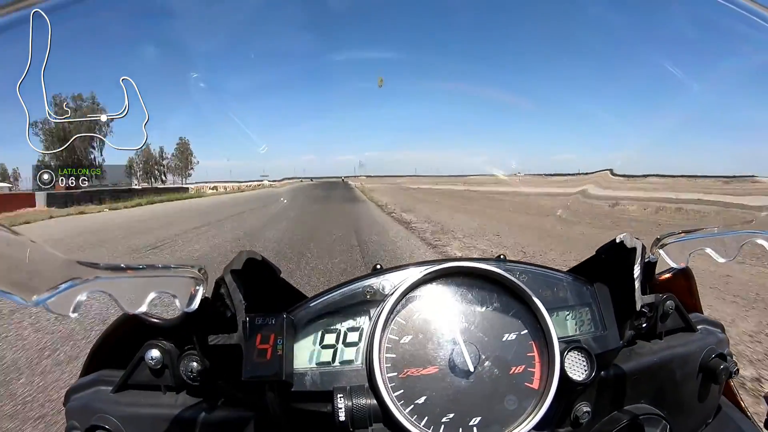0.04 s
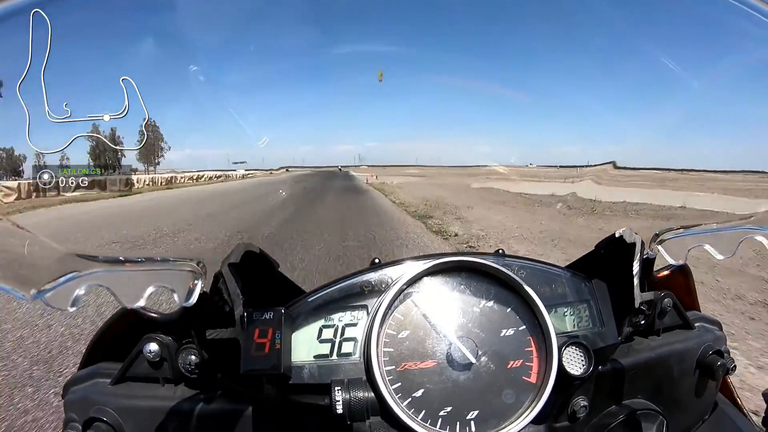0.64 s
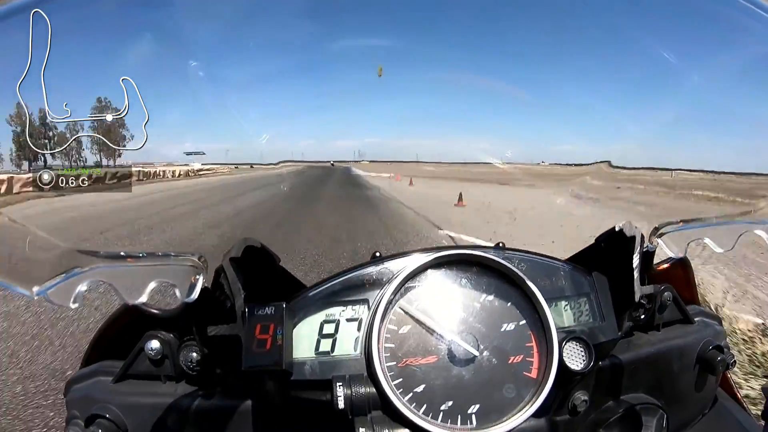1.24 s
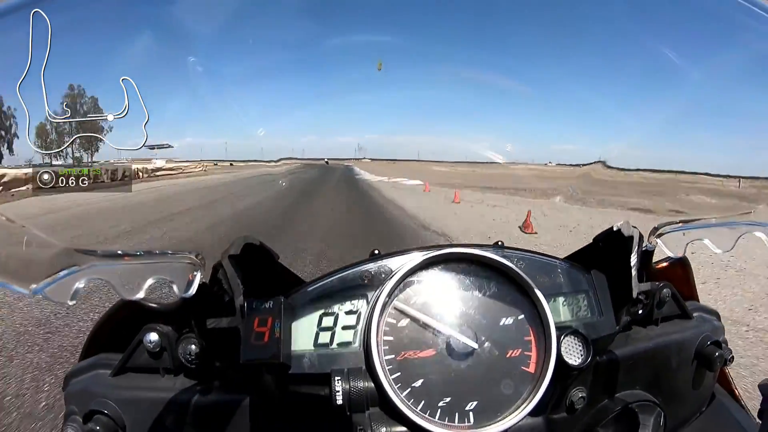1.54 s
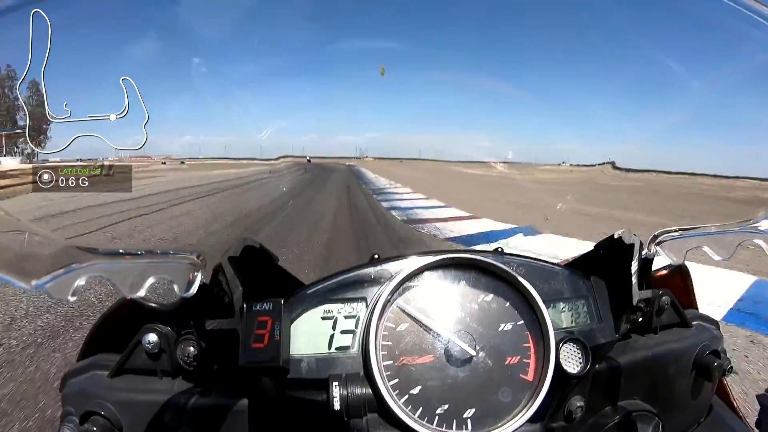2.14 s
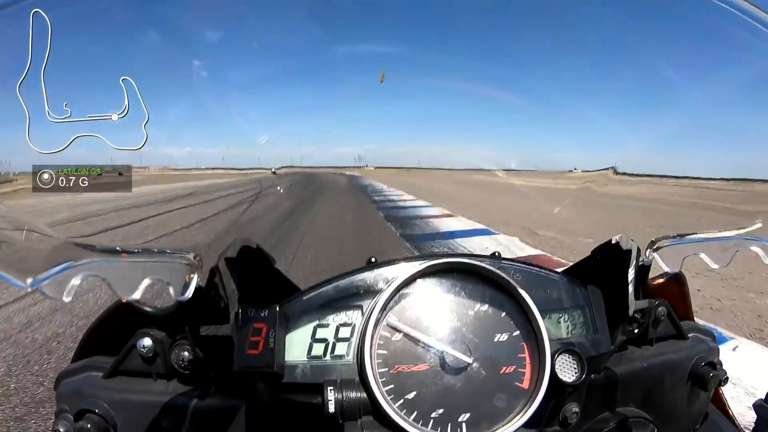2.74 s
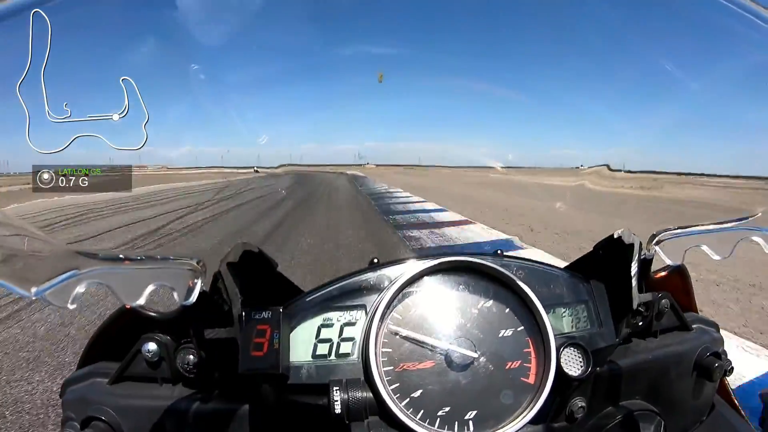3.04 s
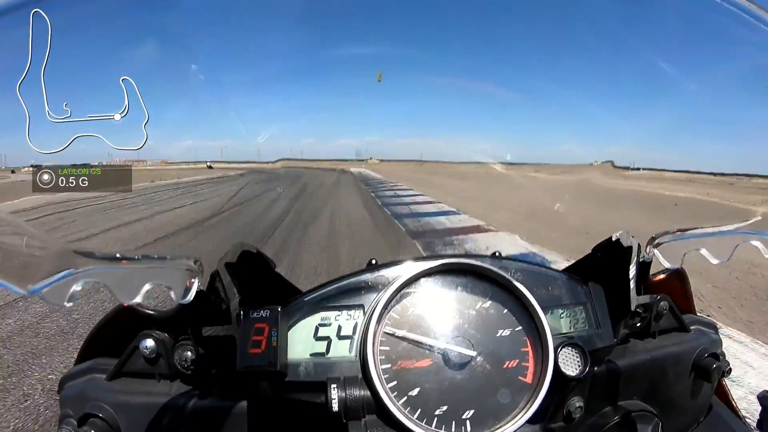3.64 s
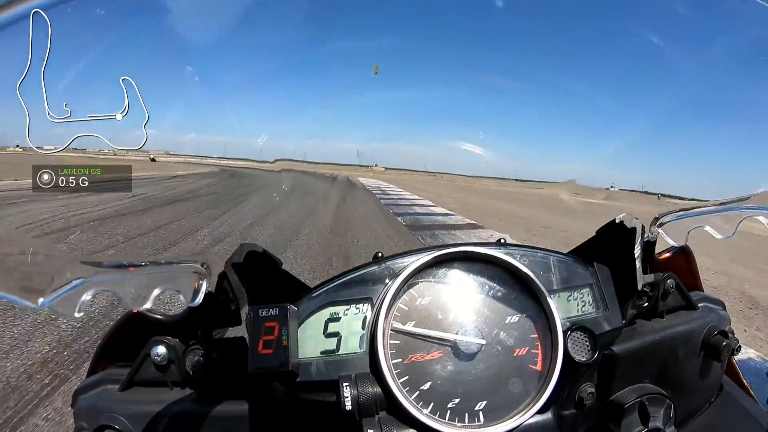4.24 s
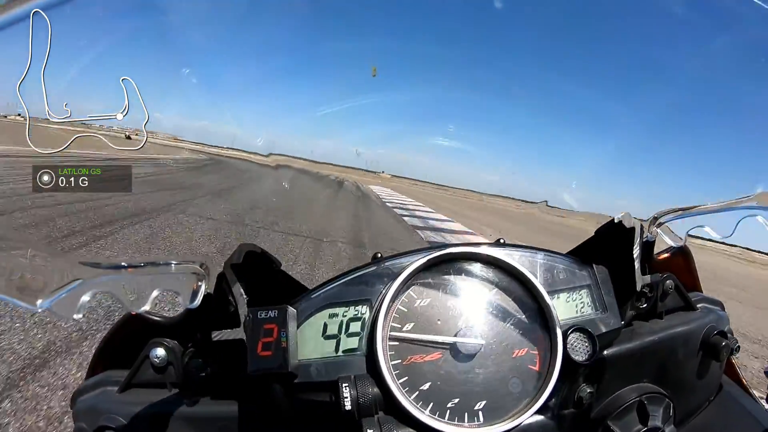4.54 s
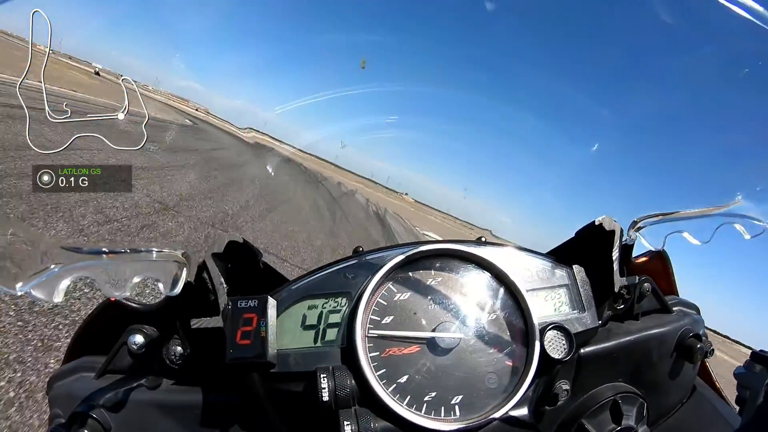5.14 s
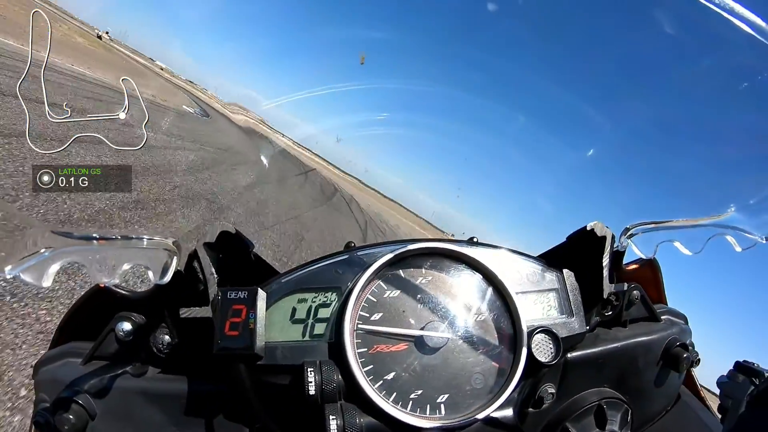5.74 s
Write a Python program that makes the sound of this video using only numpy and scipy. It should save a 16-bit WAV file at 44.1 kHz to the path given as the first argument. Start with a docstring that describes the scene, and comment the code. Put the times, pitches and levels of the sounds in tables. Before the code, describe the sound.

Onboard a sport motorcycle braking for a corner, the engine note falls and blips twice while the fairing rattles and wind rumbles.

```python
"""A booming engine note and a buzzing fairing, close up: a four-cylinder sport motorcycle brakes for a
corner with two downshifts, the microphone tucked behind its screen. Thin overtones and gear whine ride
on the firing note. Engine braking shakes the plastic hardest; the rattle drops whenever the clutch is
pulled and returns as the throttle opens, while a loose fastener ticks in the lean.
Wind rumbles and rushes, and its gusts choke the microphone for instants."""
import sys
import numpy as np
from scipy import signal
from scipy.fft import rfft, irfft
from scipy.io import wavfile
from scipy.ndimage import uniform_filter1d, minimum_filter1d

SR = 44100
rng = np.random.default_rng(int(sys.argv[2]) if len(sys.argv) > 2 else 0)


def materialize(psi):
    """Save the field psi as 16-bit PCM at rate SR to the path in sys.argv[1].

    A 1-D psi becomes a single channel; in a 2-D psi each row is a channel.
    """
    bounded = np.clip(np.atleast_2d(psi).T, -1, 1)
    quanta = np.round(bounded * 32767).astype(np.int16)
    wavfile.write(sys.argv[1], SR, quanta)


N = 255780
TIME = np.arange(N) / SR


def amp(db):
    """Decibels to gain."""
    return 10 ** (np.asarray(db) / 20)


def unit(x):
    """Scales to rms 1."""
    return x / np.sqrt(np.mean(x ** 2) + 1e-20)


def follow(table):
    """The columns of a curve table at every sample."""
    s, *columns = np.transpose(table)
    return np.squeeze([np.interp(TIME, s, c) for c in columns])


def wander(hz, size=16384):
    """Smooth random drift of rms 1, rolling off above hz."""
    f = np.fft.rfftfreq(size, N / SR / size)
    slow = irfft(rfft(rng.standard_normal(size)) * np.exp(-(f / hz) ** 2), size)
    return unit(np.interp(np.linspace(0, size - 1, N), np.arange(size), slow))


def envelope(start, hold_s, rise_s, fall_s):
    """Straight rise, dying away from hold_s after the start."""
    return np.clip((TIME - start) / rise_s, 0, 1) * np.exp(-np.maximum(TIME - start - hold_s, 0) / fall_s)


def arch(start, end):
    """Half a sine from start to end."""
    return abs(np.sin(np.pi * np.clip((TIME - start) / (end - start), 0, 1)))


def colour(x, spectrum, size=2048):
    """Causal filter with the given spectrum: its peaks ring after each click."""
    hz, db = np.transpose(spectrum)
    f = abs(np.fft.fftfreq(size, 1 / SR))
    log_gain = np.log(amp(np.interp(np.log(f + 1), np.log(hz), db)))
    ring = np.fft.ifft(np.exp(np.conj(signal.hilbert(log_gain)))).real
    return signal.oaconvolve(x, ring)[:N]


def resonate(x, hz, width):
    """One resonance of gain 1."""
    return signal.lfilter(*signal.iirpeak(hz, hz / width, fs=SR), x)


def order(cycles, multiple):
    """A sine at a multiple of the firing rate, each multiple with its own starting phase."""
    return np.sin(2 * np.pi * multiple * cycles + multiple ** 2)


def stack(cycles, orders, rough):
    """Engine orders, each fluttering on its own."""
    return sum(amp(db) * (1 + rough * wander(55)) * order(cycles, k) for k, db in orders)


def clicks(cycles):
    """One unit click as each cycle completes."""
    return np.diff(np.floor(cycles), prepend=np.floor(cycles[0])).clip(0, 1)


def strike(events, spectrum, decay_s, scrape, gain_db):
    """Each blow is a click and a short scrape that ring with the given spectrum."""
    blows, grit = np.zeros(N), rng.standard_normal(N)
    for s, db in events:
        at = round(s * SR)
        blows[at] += amp(db)
        blows[at:] += scrape * amp(db) * grit[at:] * np.exp(-np.minimum(TIME[:N - at] / decay_s, 20))
    return amp(gain_db) * colour(blows, spectrum)


def firing_note(cycles, firing_hz, dip_db, gust, choking, lag_s=.037, flutter=.029, sway=.49):
    """A near sine booms through a broad resonance; gusts at the microphone choke it and jostle its phase."""
    # The resonance. Each row: firing rate in Hz, level in dB.
    boom = [(215, -16.5), (229, -10.5), (242, -13), (255, -8.5), (264, -7), (285, -7.5), (308, -7.5),
            (335, -10), (355, -12.5)]
    # The firing note dips briefly, mostly as gusts choke the microphone.
    # Each row: centre in seconds, half length in seconds, dip in dB.
    dips = [(0.278, 0.0039, 7), (0.324, 0.0049, 12), (.405, 0.0058, 9), (0.893, 0.01, 4), (3.153, 0.065, 6),
            (5.05, 0.012, 8), (5.43, .012, 2.5)]
    lagged_hz = np.interp(TIME - lag_s, TIME, firing_hz)
    boom_db = np.interp(lagged_hz, *np.transpose(boom))
    brief_dip_db = sum(db * np.exp(-((TIME - s) / half_s) ** 2) for s, half_s, db in dips)
    level = amp(boom_db - dip_db - brief_dip_db)
    choke = 1 / np.sqrt(1 + (2 * choking * gust) ** 2)
    choke /= np.sqrt(uniform_filter1d(choke ** 2, size=4000))  # keeps the average power
    phase = 2 * np.pi * cycles + sway * choking * wander(47)
    return np.sqrt(2) * level * choke * (1 + flutter * wander(67)) * np.sin(phase)


def vibration(firing_hz, throttle, blip, mid_hz=296):
    """Levels in dB of overtones, buzz and chatter: braking, coasting, throttle and blips add in power."""
    # Engine braking, clutch home. Each row: start, hold and release in seconds, then relative
    # levels of overtones, buzz and chatter in dB.
    overruns = [(-.8, 2.3, .025, -34.6, -35.3, -53.5), (1.66, 1.17, .06, -33, -35.8, -51),
                (3.35, .435, .025, -41.5, -38.5, -55)]
    # Each of these lists overtones, buzz, chatter.
    build_s = (.55, 0.4, 0.94)
    coasting_db = (-46, -49.5, -80.5)
    with_throttle_db = (-6.5, -4.5, -31.5)
    with_blip_db = (-6.5, -10, -42.5)
    rev_db_per_hz = (0, .1033, .02)
    braking = sum(np.transpose([envelope(start, hold_s, rise_s, fall_s) for rise_s in build_s]) * amp(db)
                  for start, hold_s, fall_s, *db in overruns)
    braking *= amp(np.outer(firing_hz - mid_hz, rev_db_per_hz))
    driving = np.outer(throttle, amp(with_throttle_db))
    blipping = np.outer(blip, amp(with_blip_db))
    return 10 * np.log10(braking ** 2 + amp(coasting_db) ** 2 + driving ** 2 + blipping ** 2).T


def overtones(cycles, level_db):
    """Upper engine orders, smeared by uneven firing and lifted by the bodywork around the microphone."""
    # Gear mesh and uneven firing add tones between the whole orders.
    # Each row: multiple of the firing rate, relative level in dB.
    orders = [(2, 3.5), (2.5, -25.5), (2.75, -13.5), (3, -3), (3.75, -4), (4, -1.5), (4.5, -13), (5, -3.5),
              (5.75, -20), (6, -6.5), (7, -24.5), (8, -33), (9, -33.5), (10, -17.5), (12, -14.5),
              (13, -21.5), (14, -21), (15, -19.5)]
    # Bodywork resonances. Each row: centre in Hz, width in Hz, gain of the added ring in dB.
    panels = [(950, 360, 0), (1630, 190, 1.5), (2010, 47, 5)]
    raw = stack(cycles + .0075 * wander(60), orders, rough=.48)
    ring = sum(amp(db) * resonate(raw, hz, width) for hz, width, db in panels)
    return amp(level_db) * unit(raw + ring)


def shaking(drift=.03):
    """The rattle's swing in dB as the front of the bike shakes in spells, each at an unsteady rate."""
    # Each row: start and end in seconds, shake rate in Hz, swing in dB.
    shakes = [(-.4, 1.9, 24.9, 3), (1.148, 1.55, 52, 2.5), (1.652, 2.1, 86, 3), (1.85, 2.65, 24.9, 3),
              (4.6, 7.5, 17, 0.5)]
    swing = np.zeros(N)
    for start, end, hz, db in shakes:
        unsteady_hz = hz * (1 + drift * wander(4))
        swing += db * arch(start, end) * np.sin(2 * np.pi * np.cumsum(unsteady_hz) / SR)
    return swing


def fairing_buzz(cycles, shake_db, level_db, slack=.061, contact=.38, bed=.084, uneven_db=1.7, gain_db=-1):
    """The plastic screen, right by the microphone, taps and rasps once a firing, louder on each shake."""
    # The screen's ring. Each row: frequency in Hz, relative gain in dB.
    spectrum = [(700, -22.5), (1200, -12.5), (1590, -1), (1900, 2.5), (2200, -22.5), (2800, -5),
                (3200, -4.5), (3480, 4), (3800, -2.5), (4200, -2.5), (4900, -13), (5350, -5.5),
                (5680, -0.5), (6100, -22), (7100, -25), (9000, -17), (11500, -61.5)]
    since_contact = (cycles + slack * wander(80)) % 1
    rasp = (bed + np.exp(-since_contact / contact)) * rng.standard_normal(N)
    taps = clicks(cycles + .008 * wander(60))
    drive = (unit(rasp) + .55 * unit(taps)) * amp(shake_db + uneven_db * wander(110))
    return amp(level_db + gain_db) * unit(colour(drive, spectrum))


def edge_chatter(cycles, shake_db, level_db, steep=1.2, uneven_db=3, gain_db=6):
    """A loose edge clicks and scrapes about once a firing, in bursts at the height of each shake."""
    # The edge's bright ring. Each row: frequency in Hz, relative gain in dB.
    spectrum = [(1000, -2), (3500, 2.5), (6000, -0.5), (7200, -15.5), (8200, -6.5), (9100, -1.5),
                (9800, -4.5), (10700, -11), (11400, -23.5), (14000, -24), (16000, -38.5)]
    loose_cycles = cycles + .12 * wander(110)
    rub = .2 * np.exp(-(loose_cycles % 1) / .2) * rng.standard_normal(N)
    drive = (clicks(loose_cycles) + rub) * amp(steep * shake_db + uneven_db * np.tanh(wander(120)))
    return amp(level_db + gain_db) * unit(colour(drive, spectrum))


def wind(gust, choking, rumble_db, rush_db, lump_db=2, flicker_db=1.5, spit=.94):
    """Air on the microphone: a lumpy rumble, and a rush that spits with each gust."""
    # The two wind spectra. Each row: frequency in Hz, relative gain in dB.
    rumble_spectrum = [(15, -18), (30, -7.5), (65, 1.5), (110, -2), (160, 1), (210, -2.5), (280, 4),
                       (380, -12), (520, -17), (900, -45), (6000, -110)]
    rush_spectrum = [(120, -9), (220, -6), (278, 19), (340, 2.5), (450, -6), (600, 0.5), (780, 3),
                     (1000, 5), (1300, 5), (1550, 1.5), (2000, -2.5), (2500, -3.5), (2900, -14.5),
                     (4500, -7.5), (6000, -13), (7200, -27), (12000, -70.5)]
    rumble = unit(colour(rng.standard_normal(N), rumble_spectrum) * amp(lump_db * wander(60)))
    grain = amp(flicker_db * wander(200)) * (1 + spit * choking * np.minimum(gust ** 2, 2))
    rush = unit(colour(rng.standard_normal(N) * grain, rush_spectrum))
    return amp(rumble_db + 3.5) * rumble + amp(rush_db + 1.5) * rush


def gear_whine(cycles, jitter=.008):
    """Gears, and parts that an engine order sets singing, swell and fade in thin crank-locked whines."""
    # Each row: start and end in seconds, multiple of the firing rate, level in dB, roughness from 0 to 1.
    whines = [(0.03, 0.657, 6, -46, 0.5), (0.5, 0.95, 4, -44, 0.7), (0.65, 1.074, 5, -44, 0.7),
              (1.473, 1.55, 4, -34.5, 0.3), (2.38, 2.887, 4, -39, 0.4), (2.86, 3.032, 4, -45, 0.6),
              (3.2, 4.2, 4, -43.5, 0.8), (3.002, 4.499, 8.48, -52.5, .4), (3.2, 4.422, 2.76, -53, 0.4),
              (4.1, 6.195, 2.97, -49.5, 0.51)]
    out = np.zeros(N)
    for start, end, multiple, db, rough in whines:
        swell = np.sqrt(2) * amp(db) * np.sqrt(arch(start, end))
        out += swell * (1 + rough * wander(53)) * order(cycles + jitter * wander(25), multiple)
    return out


def fairing_knocks():
    """Bumps knock the fairing, close to the microphone."""
    # Each row: time in seconds, relative strength in dB.
    knocks = [(0.057, -13), (0.1234, -13), (0.2014, -14), (0.4014, -19), (0.4772, -11), (0.591, -12.5),
              (0.7905, -15.5), (1.9758, -21), (3.1227, -22.5), (3.7754, -30), (4.8415, -15.5), (5.029, -18),
              (5.041, -22), (5.2644, -20)]
    # The struck fairing. Each row: frequency in Hz, gain in dB.
    spectrum = [(500, -18.5), (1500, 9.5), (2700, 1.5), (3500, 3.5), (4500, -1), (5700, 1.5), (7100, -23),
                (9100, -4.5), (10600, -21.5), (11600, -41), (15000, -44.5)]
    return strike(knocks, spectrum, decay_s=.004, scrape=.2, gain_db=6.5)


def throttle_blips(rise_s=.15):
    """A blip at each downshift: gain of the burble, dip of the firing note in dB, added choking."""
    # Each row: start, hold and decay in seconds, burble level in dB, dip in dB, added choking.
    downshifts = [(1.562, .26, 0.079, -29.5, 1.9, 0.02), (3.029, 0.2, .22, -35, 1.1, .1)]
    return sum(np.outer([amp(db), dip_db, choking], envelope(start, hold_s, rise_s, fall_s))
               for start, hold_s, fall_s, db, dip_db, choking in downshifts)


def exhaust_burble(cycles, blip, uneven_db=1.5, puff_cycles=.6):
    """Ragged puffs from the exhaust, one a firing, as the throttle is blipped."""
    # The exhaust's tone. Each row: frequency in Hz, relative gain in dB.
    spectrum = [(150, -13), (470, 6.5), (640, 5), (800, -2), (1080, 2.5), (1450, -7), (1900, -9.5),
                (2700, -28), (6000, -36.5), (12000, -80)]
    puffs = np.exp(-(cycles % 1) / puff_cycles) * amp(uneven_db * wander(130)) * rng.standard_normal(N)
    return blip * unit(colour(puffs, spectrum))


def gearbox_clunks():
    """The gearbox clunks at the second downshift and as the drive takes up."""
    # Each row: time in seconds, relative strength in dB.
    clunks = [(3.077, -37), (3.098, -23), (3.359, -30)]
    # The gearbox's ring. Each row: frequency in Hz, gain in dB.
    spectrum = [(150, 0), (500, 16), (750, 1), (1080, 10.5), (1450, -15), (1900, -2), (2800, -36.5),
                (6000, -28), (12000, -80)]
    return strike(clunks, spectrum, decay_s=.0066, scrape=.08, gain_db=29)


def loose_fastener(shake_hz=23.54, touches_per_s=80, uneven_db=3, jiggle_db=-39.5):
    """A fastener ticks at the shift; leaned over, it jiggles once a shake with lighter touches between."""
    # The loudest ticks. Each row: time in seconds, relative strength in dB.
    ticks = [(3.159, -27), (3.175, -25), (4.7825, -34), (4.9521, -23), (4.998, -23), (5.0689, -26),
             (5.3882, -21), (5.4176, -23), (5.4804, -22), (5.5648, -25), (5.6077, -23), (5.6514, -20.5),
             (5.6944, -19.5), (5.7154, -19)]
    # The fastener's ring. Each row: frequency in Hz, gain in dB.
    spectrum = [(600, -21), (1700, 5), (2800, -6), (3250, -3), (3520, 7), (3900, -2.5), (5000, -15.5),
                (5750, -11.5), (7000, -26), (9200, -21.5), (11500, -50)]
    loud_ticks = strike(ticks, spectrum, decay_s=.003, scrape=.05, gain_db=24.5)
    beats = clicks(shake_hz * TIME + .04 * wander(20)) * amp(uneven_db * np.tanh(wander(40)))
    touches = (rng.random(N) < touches_per_s / SR) * rng.uniform(.5, 1, N)
    lean = np.clip((TIME - 4.21) / .72, 0, 1)  # the bike tips into the corner
    return loud_ticks + amp(jiggle_db) * lean * unit(colour(beats + .73 * touches, spectrum))


def intake_growl(cycles, throttle, jitter=.004):
    """With the throttle ajar the intake adds a rough comb of engine orders."""
    # Each row: multiple of the firing rate, relative level in dB.
    orders = [(1.5, -7.5), (2, 1), (2.5, -1.5), (3, -0.5), (4, -7), (4.5, -14), (5, -12), (5.75, -9),
              (6, -10), (8.5, -6.5), (9, -10), (9.5, -14), (10, -14.5), (10.5, -3.5), (11.5, -7),
              (21, -15.5)]
    return throttle * unit(stack(cycles + jitter * wander(60), orders, rough=.5))


def scene(full_choke_db=-13.5, choke_steepness=1.4, throttle_flutter=5.6):
    """Engine, fairing and wind at one microphone riding behind the screen."""
    # Engine speed. Each row: time in seconds, firing rate in Hz.
    revs = [(0, 353), (.4, 335), (1.13, 293.5), (1.4, 295.6), (1.5, 276.5), (1.61, 239.1), (1.69, 271.8),
            (1.88, 291), (2.08, 294.2), (2.95, 265.1), (3.03, 255.3), (3.15, 219), (3.23, 243),
            (3.41, 248.4), (3.7, 267.6), (4.05, 252), (4.25, 241.7), (4.95, 225.9), (5.22, 228),
            (5.3, 238.7), (5.35, 222.8), (5.8, 229.7)]
    # The throttle cracks open. Each row: time in seconds, level of the intake growl in dB.
    opening = [(0, -80), (3.3, -70), (3.9, -53.5), (4.4, -40.5), (4.9, -37.5), (5.4, -35), (5.8, -33)]
    # Wind strength. Each row: time in seconds, relative levels of rumble and rush in dB.
    airflow = [(0, -18, -30), (.75, -23.5, -31.5), (1.3, -30, -34), (1.58, -24.5, -36.5),
               (1.75, -20.5, -35.5), (1.95, -23, -36), (2.25, -25.5, -34.5), (2.55, -30, -35.5),
               (3.05, -26.5, -38), (3.35, -24, -37), (3.63, -30.5, -31.5), (3.84, -30, -39.5),
               (4.3, -29.5, -35.5), (4.6, -24.5, -34.5), (5.25, -27, -29), (5.8, -24, -28.5)]
    firing_hz, throttle = follow(revs), amp(follow(opening))
    rumble_db, rush_db = follow(airflow)
    cycles = np.cumsum(firing_hz) / SR  # one cycle a firing
    gust, shake_db = wander(64), shaking()
    blip, dip_db, blip_choking = throttle_blips()
    overtone_db, buzz_db, chatter_db = vibration(firing_hz, throttle, blip)
    wind_choking = amp(choke_steepness * (rumble_db - full_choke_db))
    choking = wind_choking + blip_choking + throttle_flutter * throttle  # throttle roughens the note too
    engine = firing_note(cycles, firing_hz, dip_db, gust, choking) + overtones(cycles, overtone_db)
    engine += intake_growl(cycles, throttle) + exhaust_burble(cycles, blip) + gear_whine(cycles)
    rattles = fairing_buzz(cycles, shake_db, buzz_db) + edge_chatter(cycles, shake_db, chatter_db)
    rattles += fairing_knocks() + gearbox_clunks() + loose_fastener()
    return (engine + rattles + wind(gust, choking, rumble_db, rush_db))[None]


def record(dry, ceiling=.8, cutoff_hz=15800):
    """A quick limiter holds the peaks; a steep low-pass trims the top."""
    allowed = np.minimum(1, ceiling / (abs(dry) + 1e-9))
    limited = dry * uniform_filter1d(minimum_filter1d(allowed, size=300), size=300)
    return signal.sosfilt(signal.butter(16, cutoff_hz, fs=SR, output="sos"), limited)


dry = scene()
out = record(dry)
materialize(out)
```